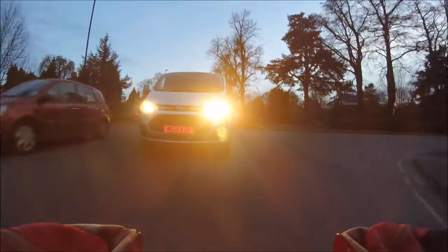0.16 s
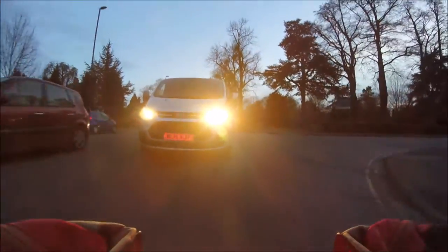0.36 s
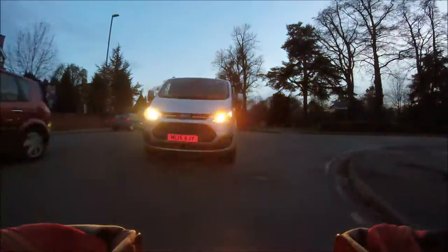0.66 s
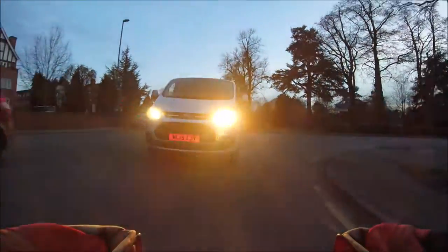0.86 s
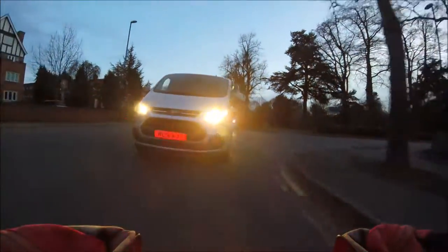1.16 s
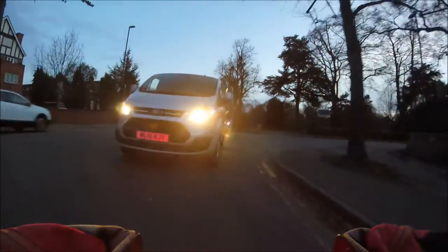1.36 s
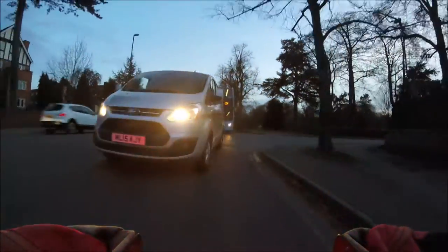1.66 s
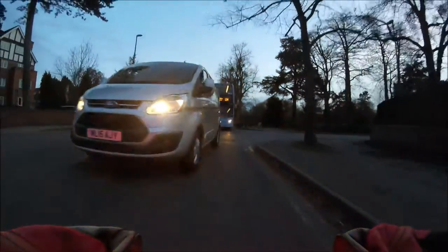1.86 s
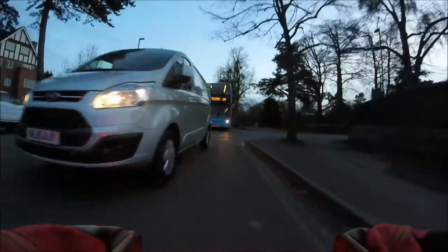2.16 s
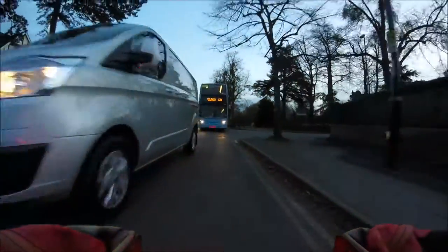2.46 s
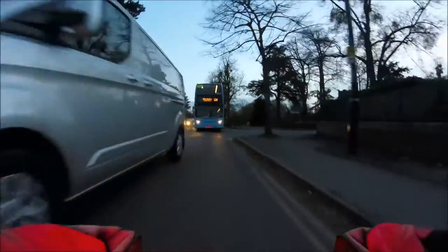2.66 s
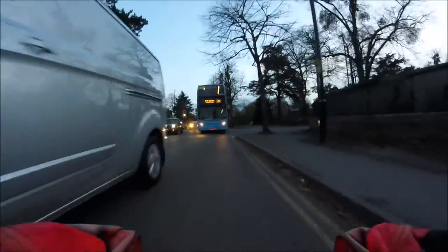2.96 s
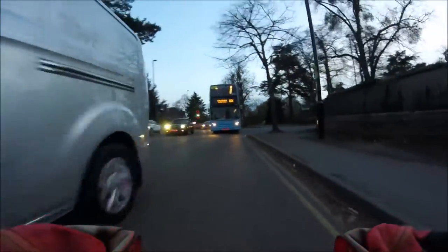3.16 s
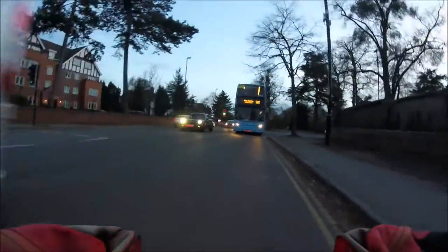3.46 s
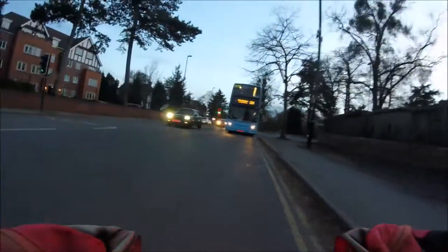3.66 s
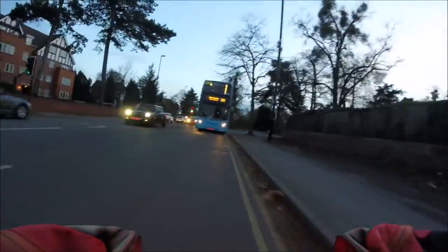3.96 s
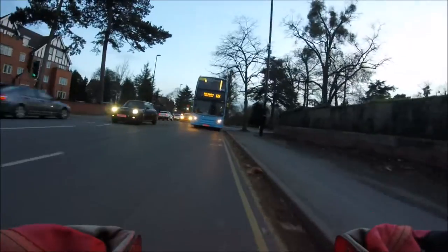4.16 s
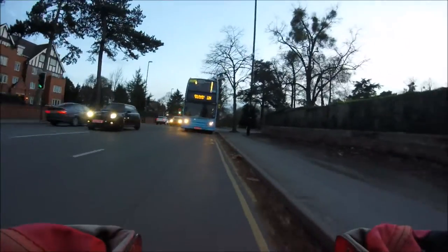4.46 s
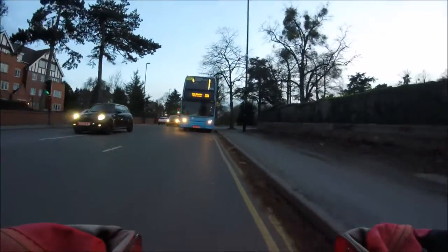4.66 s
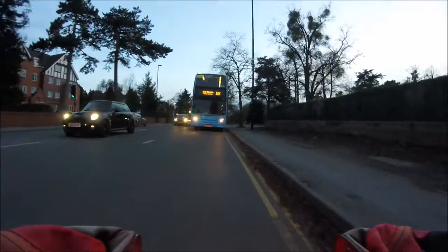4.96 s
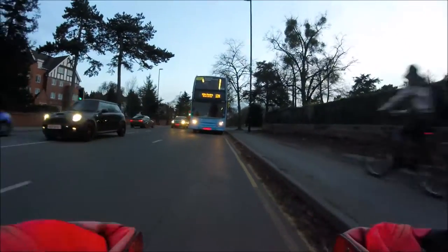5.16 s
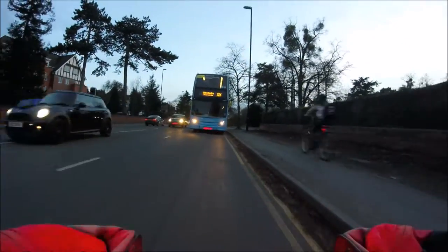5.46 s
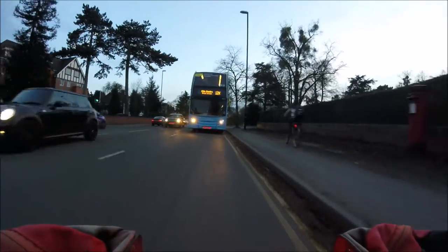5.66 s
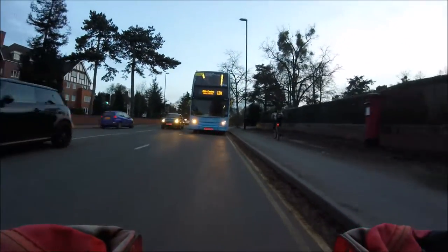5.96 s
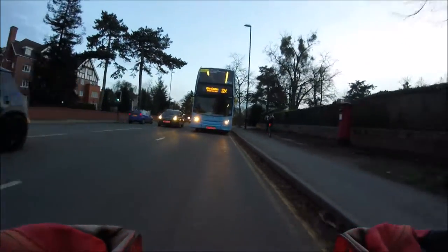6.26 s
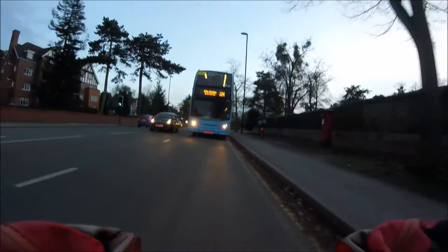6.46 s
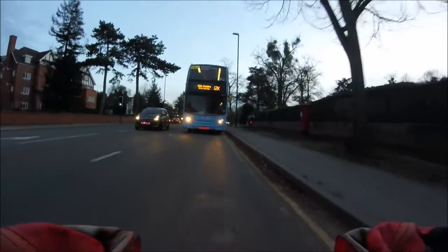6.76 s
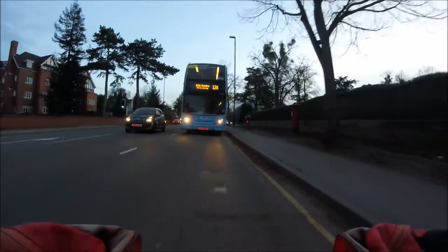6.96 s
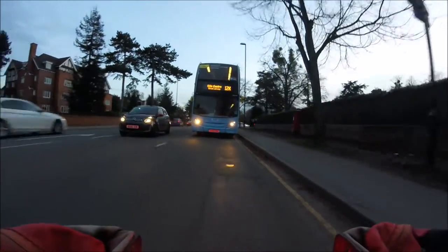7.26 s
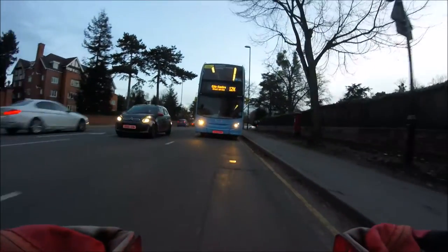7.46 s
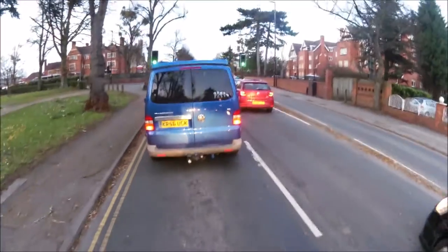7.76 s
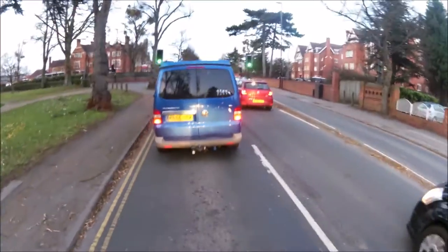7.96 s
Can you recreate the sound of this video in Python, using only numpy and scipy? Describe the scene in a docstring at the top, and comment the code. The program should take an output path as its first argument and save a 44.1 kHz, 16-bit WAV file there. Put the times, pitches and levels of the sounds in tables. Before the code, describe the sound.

From a closed case fixed to a moving bicycle, a loud low hum throbs several times a second over muffled road rattle, wind buffeting and dry plastic knocks. Passing vehicles add only faint hiss. Late on, a dense burst of knocks, heavy thumps and crackling overload, then thinning hum. A hard cut to short silence, then a second, open microphone hears broad tyre roar, a rising engine tone and tiny thin whistles.

```python
"""A small camera in a closed case rides a bicycle in traffic: from the start its mount hums at one low mode, the
case rattles and knocks in its resonances over bumps, wind buffets the port and vehicles hiss past. Late in the
ride the overloaded sound crackles, made of bright ticks. After a short silence a second, open camera hears a
street: roar of tyres in noise bands, an engine in two gliding sines and a thin whistle that comes and goes."""
import sys
import numpy as np
from scipy import signal
from scipy.io import wavfile

SR = 44100
rng = np.random.default_rng(int(sys.argv[2]) if len(sys.argv) > 2 else 0)


def dump_mix(stems):
    """Bounce the given channels to the path in sys.argv[1] as a 16-bit WAV at rate SR."""
    frames = np.atleast_2d(stems).T  # one column per channel
    limited = np.clip(frames, -1, 1)  # hard clip at full scale
    pcm = np.round(limited * 32767).astype(np.int16)
    wavfile.write(sys.argv[1], SR, pcm)


def field_ratio(decibels):
    """Amplitude ratio for a level in dB (20 dB per decade); scalars and array-likes work."""
    return 10 ** (np.asarray(decibels, dtype=float) / 20)


N = 357210
CUT_S, RESUME_S = 7.348, 7.586  # the silence lies between


def rms_one(x):
    """Scales to unit rms."""
    return x / np.sqrt(np.mean(x ** 2) + 1e-20)


def in_time(rows):
    """Columns of a curve table, interpolated at every sample."""
    s, *columns = np.transpose(rows)
    return [np.interp(np.arange(N) / SR, s, c) for c in columns]


def drift(rate_hz):
    """Slow chance of spread 1: noise at every 20th sample through a double one-pole."""
    r = np.exp(-2 * np.pi * rate_hz * 20 / SR)
    noise = rng.standard_normal(N // 20 + 2002)
    slow = signal.lfilter([1], [1, -2 * r, r * r], noise)[2000:]  # leaves out the settling
    return np.interp(np.arange(N) / 20, np.arange(len(slow)), rms_one(slow))


def band(x, low_hz, high_hz, order=2):
    """Butterworth band-pass."""
    return signal.sosfilt(signal.butter(order, [low_hz, high_hz], "band", fs=SR, output="sos"), x)


def filtered(x, order, hz, kind="low"):
    """Butterworth low-pass or high-pass."""
    return signal.sosfilt(signal.butter(order, hz, kind, fs=SR, output="sos"), x)


def resonance(x, hz, width_hz):
    """Two-pole resonance with gain 1 on top."""
    r = np.exp(-np.pi * width_hz / SR)
    zeros = np.array([1, 0, -1]) * (1 - r * r) / 2
    return signal.lfilter(zeros, [1, -2 * r * np.cos(2 * np.pi * hz / SR), r * r], x)


def plateaus(rows, up_db_per_s, down_db_per_s):
    """Gain from rows of (t/s, level/dB, hold/s): each rises, holds and dies away; their powers add."""
    t, power = np.arange(0, N + 32, 32) / SR, 0
    for s, level_db, held in rows:
        early, late = np.maximum(s - t, 0), np.maximum(t - s - held, 0)
        power = power + field_ratio(level_db - up_db_per_s * early - down_db_per_s * late) ** 2
    return np.interp(np.arange(N) / SR, t, np.sqrt(power))


# the road sets the mount swinging on its spring: [t/s at full swing, rms level/dB, hold/s]
SWINGS = [(0.0, -13, 0.1), (0.31, -11, 0.11), (0.46, -12, .11), (0.79, -17, 0.0077), (0.9, -18.5, 0.18),
          (1.13, -13.5, 0.068), (1.34, -20, 0.081), (1.54, -7, 0.02), (1.76, -11, 0.063),
          (1.92, -18.5, 0.096), (2.11, -15.5, 0.0077), (2.24, -12.5, 0.024), (2.36, -12, 0.045),
          (2.53, -15, 0.0045), (2.65, -9.5, 0.1), (2.91, -10, 0.084), (3.15, -13, 0.061),
          (3.28, -11.5, 0.058), (3.47, -18.5, 0.094), (3.68, -15, .005), (3.77, -14.5, 0.17),
          (4.09, -7.5, 0.047), (4.28, -14, 0.015), (4.45, -10, 0.018), (4.6, -9.5, 0.071), (4.82, -14, .1),
          (5.05, -17.5, .005), (5.15, -11, .07), (5.39, -14, .01), (5.49, -15.5, 0.027),
          (5.64, -9.5, 0.036), (5.83, -11, 0.14), (6.03, -12, 0.056), (6.19, -11, 0.051),
          (6.34, -9.5, 0.089), (6.64, -13, 0.014), (6.86, -18.5, 0.0041), (6.96, -26.5, .1),
          (7.17, -21.5, 0.022), (7.24, -35, .01), (7.31, -14, 0.037)]


def mount():
    """The mount's mode is a near sine whose pitch wavers, with a weak overtone."""
    mode_hz = 69.56 * (1 + 0.02215 * drift(9.9))
    phase = 2 * np.pi * np.cumsum(mode_hz) / SR
    swing = np.sin(phase) + field_ratio(-30.0) * np.sin(2 * phase)
    gain = plateaus(SWINGS, up_db_per_s=224, down_db_per_s=145.5)
    return np.sqrt(2) * gain * swing


# slow jolts of the whole frame: [t/s, peak level/dB, length/s, direction (1 up, -1 down)]
JOLTS = [(0.292, -7, 0.058, -1), (0.72, -15, 0.04, -1), (0.996, -5.5, 0.014, -1), (1.622, -10, 0.017, -1),
         (2.616, -16, 0.023, -1), (3.686, -8, 0.011, -1), (5.396, -5.5, 0.0065, -1),
         (6.49, -2.5, 0.014, -1), (6.648, -9, 0.02, -1), (6.6847, -1, 0.0035, 1)]


def jolts():
    """Each jolt is one push of the frame, with weaker swings the other way on both sides of it."""
    t, out = np.arange(N) / SR, np.zeros(N)
    for s, peak_db, length, direction in JOLTS:
        near = slice(max(round((s - .15) * SR), 0), round((s + .15) * SR))
        x = (t[near] - s) / (length / 4)
        out[near] += np.sign(direction) * field_ratio(peak_db) * (1 - 0.36 * x ** 2) * np.exp(-x ** 2 / 2)
    return out


def road_grit(per_s, size_db, t60):
    """Road texture: small uneven jolts ride on a steady shake, and the whole flickers."""
    struck = rng.random(N) < per_s / SR
    small_jolts = struck * field_ratio(size_db + 6 * np.minimum(rng.exponential(1, N), 3))
    r = field_ratio(-60 / (t60 * SR))
    return rms_one(field_ratio(1.6 * drift(76)) * (1 + signal.lfilter([1], [1, -r], small_jolts)))


# knocks of the case: [t/s, relative strength/dB, hardness/dB, favoured f/Hz, extra low weight/dB]
KNOCKS = [(0.0869, -19, 15, 2190, -5), (0.2961, -12, -11, 2190, -3), (0.542, -7.5, -9.5, 2670, 7),
          (0.5437, -17.5, -18, 595, 4), (0.552, -22, -17, 2190, 3), (0.608, -16.5, -7, 2190, -2),
          (0.661, -18, -14, 1600, -7), (1.0983, -23.5, -14, 2140, -6), (1.144, -24, 10, 1600, 3),
          (1.15, -17, 1, 2220, -6), (1.153, -24, 13, 6360, -2), (1.1712, -12, 1, 2670, 0),
          (1.1825, -10.5, 4, 2190, 2.5), (1.184, -11.5, 2, 3300, 0), (1.1965, -20, 3, 1550, -1),
          (1.202, -22, 5, 3970, 2), (1.3504, -34, 8, 3340, 2.5), (1.6606, -21.5, 3, 2320, -2),
          (1.8085, -13, 0, 2100, -6), (1.8097, -10.5, 0, 2760, 5), (1.8715, -24, -3, 1520, 4.5),
          (1.9166, -31, -7, 1600, -5), (2.0665, -25, -10, 2100, 7), (2.0749, -18.5, 5, 1450, 1.5),
          (2.5356, -22, 1.5, 2190, 3), (2.8096, -19.5, -1, 1150, 6.5), (2.8184, -17, -4, 2190, -1),
          (2.824, -14, 10, 1600, -3), (2.871, -16, -3, 1600, 0.5), (2.9864, -18, 1, 1600, -2),
          (2.9936, -22, -2, 3320, 0), (3.0171, -11, 11, 2190, 2), (3.018, -14.5, 2.5, 1600, 2),
          (3.0325, -26, -9, 1600, 3), (3.29, -22.5, 7, 2190, -1), (3.508, -22, -1, 1330, -12),
          (4.0524, -15, 5.5, 1620, 4.5), (4.7632, -14, -12, 1150, 3), (4.7858, -32.5, 7, 2800, -2),
          (4.7922, -8, -1, 3930, -3), (4.7926, -10, 2, 2665, 0.5), (4.807, -37, -4, 4000, 0),
          (5.65, -31, 17, 2190, -3), (6.359, -19, 1.5, 1680, 2), (6.479, -28, 7, 2190, 2),
          (6.5177, -20.5, -7, 1150, -3), (6.533, -28, 2, 3990, 1), (6.5419, -8, 3, 3230, -3),
          (6.6, -22.5, 11, 1600, -13), (6.647, -21, 3, 2010, -1.5), (6.658, -27, 2, 3920, 6),
          (6.6822, -6, 2, 2190, 6), (6.692, -7, 3.5, 1494, -4), (6.6978, -12, -4, 3910, -3.5),
          (6.7018, -16, 8, 1600, 3.5), (6.717, -16.5, 5.5, 2190, 2), (6.7297, -24, 1, 2670, -4),
          (6.7563, -25, -4, 2600, -1), (6.7926, -34, 0, 1600, 0), (6.8285, -12.5, 0, 1600, -5),
          (6.8374, -11, -9, 1150, -5.5), (6.8405, -9.5, -2, 2700, -2), (6.8475, -16, 0, 2190, -4),
          (6.8523, -14, 4, 2190, -6), (6.857, -23, -3, 1600, -7), (6.8662, -11, 5.5, 1560, -0.5),
          (6.8845, -21, 4, 2670, 1), (6.893, -32, 4, 3900, 0), (7.2072, -17.5, 5.5, 2100, -2.5)]


def knock_drive(strength_db, hz, spread_db, favour_db, blow_db):
    """How the knocks drive one mode: a short rattling burst with a faint tail, and the blow that opens it."""
    s, _, _, own_hz, _ = np.transpose(KNOCKS)
    # modes nearest a knock's own pitch gain most
    favoured_db = favour_db * np.exp(-(np.log2(hz / own_hz) / 0.21) ** 2)
    uneven_db = spread_db * rng.standard_normal(len(s))
    gains = field_ratio(strength_db + favoured_db + uneven_db)
    t = np.arange(SR // 10) / SR
    decay = field_ratio(-60 * (t / 0.013) ** 1.7)
    tail = field_ratio(-20.0 - 60 * t / 0.06)
    burst = np.minimum(t / 0.0007, 1) * (decay + tail)
    rattle, blows = np.zeros((2, N))
    for i, gain in zip(np.round(s * SR).astype(int), gains):
        rattle[i:i + len(t)] += gain * burst
        blows[i] = gain * field_ratio(blow_db)
    return rattle, blows


def case(modes, shake_db, knock_db, grit, even, narrow, patchy_db, favour_db, blow_db, tilt_db=0):
    """Road noise and knocks drive the same resonances, set in parallel with alternating sign."""
    noise, out, power = rng.standard_normal(N), 0, 0
    for k, (hz, width_hz, mode_db) in enumerate(modes):
        evened_db = knock_db - even * mode_db  # a knock reaches the weak modes better than the road does
        rattle, blows = knock_drive(evened_db, hz, 2.5, favour_db, blow_db)
        shake = field_ratio(shake_db + tilt_db * np.log2(hz / 350) + patchy_db * drift(11.6)) * grit
        drive = noise * (shake + rattle)
        drive = drive + blows * (150 / width_hz) ** narrow  # how far a blow prefers the long-ringing modes
        twice = resonance(resonance(drive, hz, 1.384 * width_hz), hz, 2.36 * width_hz)
        out = out + (-1) ** k * field_ratio(mode_db) * twice
        power += field_ratio(mode_db) ** 2 * 1.75 * width_hz * np.pi / SR
    return out / np.sqrt(power)


def loose_parts():
    """At each knock a loose part chatters for a moment at the knock's own pitch, then is damped."""
    rise_s, held_s, t60_s = 0.0012, 0.003, 0.018
    t, out = np.arange(SR // 20) / SR, np.zeros(N)
    shape = np.minimum(t / rise_s, 1) * field_ratio(-60 * np.maximum(t - held_s, 0) / t60_s)
    chance = rng.random((len(KNOCKS), 2))
    for (s, strength_db, _, hz, _), (start, bend) in zip(KNOCKS, chance):
        i = round(s * SR)
        phase = 2 * np.pi * (start + hz * t * (1 + 2.1 * (bend - .5) * t))  # the pitch bends up or down
        level_db = strength_db - 11.5 - 11.0 * max(np.log2(hz / 4000), 0)  # weaker above 4 kHz
        out[i:i + len(t)] += field_ratio(level_db) * shape * np.sin(phase)
    return out


# vehicles passing: [t/s when nearest, level/dB, approach/s, departure/s]
PASSES = [(0.0, -62, .1, 0.044), (2.599, -69.5, 0.94, 1), (3.7, -65, 0.32, 0.2)]


def passing():
    """Gain of the tyre noise, falling off with distance around each pass, over a faint constant floor."""
    t, power = np.arange(N) / SR, field_ratio(-82) ** 2
    for s, level_db, coming, going in PASSES:
        distance = (t - s) / np.where(t < s, coming, going)
        power = power + field_ratio(level_db) ** 2 / (1 + distance ** 2) ** 2
    return np.sqrt(power)


# the road as it shakes the case: [t/s, roughness level/dB, fineness of its grain/dB]
ROAD = [(0.0, -31, 0), (0.25, -26.5, -1.5), (0.37, -34.5, 3), (0.7, -33, -2), (0.86, -35, 3),
        (1.05, -32, -4), (1.18, -32.5, 9.5), (1.23, -41, 1), (1.72, -41, -2.5), (2.68, -37.5, -1),
        (3.16, -39.5, -1.5), (3.77, -35, -1.5), (4.2, -37.5, -1.5), (4.75, -35.5, -2), (5.09, -36.5, -3),
        (5.41, -33.5, 1), (5.83, -34, -3), (5.99, -38.5, -3), (6.27, -34, -1.5), (6.44, -40.5, 0),
        (6.55, -42.5, -1.5), (6.66, -42, -2), (6.71, -36.5, 5), (6.79, -49, -8.5), (6.86, -40.5, -3),
        (6.92, -46, 0), (6.98, -45, -1), (7.2, -40, -1)]
# resonances of the case in four groups: [f/Hz, nominal width/Hz, level/dB relative within the group]
CASE_LOW = [(194.4, 32, -8.5), (281.6, 75.6, -6), (320.7, 36.5, 0.5), (352, 20.8, 2.5), (419, 13, -7),
            (454.3, 36, -17), (479.7, 53, -9), (590, 146, -20.5), (679.4, 76, -16.5), (790, 107, -26.5)]
CASE_MID = [(1150, 330, -6), (1330, 228, -3), (1600, 79.4, 1), (1949, 96, -7), (2190, 120, -1.5),
            (2398, 110, -7.5)]
CASE_UPPER = [(2640, 187, -2), (3133, 290, -9.5), (3291, 92, 4), (3868, 220, -6.5), (4050, 270, -12.5),
              (4260, 130, -6), (4606, 260, -19.5)]
CASE_HIGH = [(5440, 260, -2), (5860, 140, -0.5), (6420, 250, 5), (7190, 410, -2), (7860, 580, -20.5),
             (9400, 860, -17.5)]


def ringing_case(hum):
    """Four groups of resonances and the loose parts ring together; the case dulls the top."""
    road_db, fine_db = in_time(ROAD)
    _, strength_db, hard_db, _, weight_db = np.transpose(KNOCKS)
    # how a knock reaches the low, upper and treble groups, by its strength and its hardness
    thud_db = -13 + 0.58 * strength_db - 0.22 * hard_db
    snap_db = -20.5 + strength_db + 0.75 * hard_db
    tick_db = -41 + 0.91 * strength_db + hard_db
    # finer grain takes from the low group and adds to the treble; passing tyres enter the treble too
    low_db = road_db + 13.5 - 0.78 * fine_db
    road_treble = field_ratio(road_db - 24 + 0.31 * fine_db)
    treble_db = 10 * np.log10(road_treble ** 2 + (field_ratio(7.5) * passing()) ** 2)
    tilt_db = 0.3 * (road_db - road_db.mean())  # dB per octave: brighter when rough
    grit = road_grit(per_s=51.0, size_db=-11.0, t60=0.005)
    treble_grit = grit ** 1.1 * field_ratio(8 * hum)  # the hum sways the treble rattle
    low = case(CASE_LOW, low_db, thud_db - 8 + weight_db, grit ** 0.27, even=0.59, narrow=0.12,
               patchy_db=1.5, favour_db=1.8, blow_db=27.0, tilt_db=tilt_db)
    body = case(CASE_MID, road_db - 0.08, strength_db - 13.5, grit, even=0.086, narrow=0.5,
                patchy_db=2.0, favour_db=6.5, blow_db=21.5)
    snap = case(CASE_UPPER, road_db - 6.5, snap_db, grit, even=0.19, narrow=0.18,
                patchy_db=2.5, favour_db=12.5, blow_db=23.0)
    high = case(CASE_HIGH, treble_db, tick_db, treble_grit, even=0.35, narrow=0.3,
                patchy_db=1.5, favour_db=16.0, blow_db=5.5)
    return filtered(low + body + snap + high + loose_parts(), 4, 9800)


# wind at the port, heard below the hum: [t/s, level/dB]
WIND = [(0.0, -31.5), (0.33, -14), (0.43, -30.5), (1.04, -20), (1.39, -43), (1.64, -16), (1.69, -24),
        (2.57, -23.5), (2.62, -14.5), (2.82, -25), (5.99, -25.5), (6.52, -21.5), (6.95, -42.5),
        (7.34, -34.5)]


def buffet():
    """Lumpy noise on either side of the hum, with a weaker resonance of the wind noise above it."""
    (wind_db,), (road_db, _) = in_time(WIND), in_time(ROAD)
    above_db = -27.5 + 0.2 * (wind_db - wind_db.mean()) + 0.88 * (road_db - road_db.mean())
    # it starts weaker while the bicycle gathers speed
    above_db = above_db - 9 * np.exp(-np.arange(N) / SR / 0.98)
    lumps = field_ratio(3 * np.clip(drift(6), -2, 1.5))
    below = rms_one(band(rng.standard_normal(N), 36, 66, order=3) * lumps)
    noise = rng.standard_normal(N)
    wind_mode = resonance(resonance(noise, 132, 14.0), 160, 60.0)
    above = band(noise, 75, 142.0, order=3) + field_ratio(-5.5) * wind_mode
    return field_ratio(wind_db) * below + field_ratio(above_db) * rms_one(above * field_ratio(2.0 * drift(34)))


# moments when the overloaded sound clips and crackles: [start t/s, length/s, level/dB]
OVERLOADS = [(6.49, 0.24, -57), (6.772, .008, -62.5), (6.843, 0.056, -58.5)]


def crackle():
    """Crackle of overload, drawn as sharp ticks of uneven size, each a puff of bright noise."""
    ticks = (rng.random(N) < 300.0 / SR) * field_ratio(4.0 * np.minimum(rng.exponential(1, N), 3))
    r = field_ratio(-60 / (0.0081 * SR))  # t60 8.1 ms
    puffs = rms_one(signal.lfilter([1], [1, -r], ticks + 1e-18) * rng.standard_normal(N))
    rows = [(s, db, length) for s, length, db in OVERLOADS]
    gain = plateaus(rows, up_db_per_s=698, down_db_per_s=698)
    return gain * rms_one(band(puffs, 5000, 9500) + field_ratio(-20.0) * band(puffs, 9000, 13000))


def tyres():
    """Smooth bright hiss that falls towards the top, lifted by one resonance of the port."""
    noise = rng.standard_normal(N)
    smooth = band(band(noise, 8200, 9000, order=1), 7300, 13000)
    hiss = smooth + field_ratio(7.0) * resonance(noise, 8000, 350.0)
    return passing() * rms_one(band(hiss, 5000, 15500))


def shaken_camera():
    """All that the closed camera hears, without the deepest bass."""
    hum = mount()
    whole = hum + buffet() + jolts() + ringing_case(hum) + crackle() + tyres()
    return filtered(whole, 2, 14, "high")


# colour of the street heard by the open camera: [f/Hz, relative level/dB per Hz band]
STREET = [(190, -1.5), (690, 4), (1200, 2.5), (2240, -4), (3270, -9.5), (3800, -14.5), (5340, -20.5),
          (5860, -19), (6600, -40), (7400, -24), (8440, -32), (8960, -52), (11000, -56)]


def street_roar():
    """Tyre roar in sixth-octave noise bands that swell and sink independently."""
    edges, out = 190 * 2 ** np.arange(0, 5.9, 1 / 6), 0
    hz, colour_db = np.transpose(STREET)
    white = rng.standard_normal((2, N))  # neighbouring bands take turns
    for k, (low, high) in enumerate(zip(edges, edges[1:])):
        gain_db = np.interp(np.log(low * high) / 2, np.log(hz), colour_db)
        out = out + field_ratio(gain_db + 1.3 * drift(12.7)) * band(white[k % 2], low, high)
    return field_ratio(-32.5) * rms_one(filtered(out, 8, 12400))


def engine():
    """The firing tone of an engine ahead revs up and levels off; a lower tone keeps climbing and fades."""
    since = np.maximum(np.arange(N) / SR - RESUME_S, 0)
    start_hz, top_hz, rev_s = 142.3, 170, 0.17
    firing_hz = top_hz - (top_hz - start_hz) * np.exp(-since / rev_s)
    firing = field_ratio(-44 + 2.7 * drift(7.5)) * np.sin(2 * np.pi * np.cumsum(firing_hz) / SR)
    lower_phase = 2 * np.pi * since * (85 + 48 * since / 2)  # from 85 Hz, rising 48 Hz per s
    lower = field_ratio(-40.5 - 14 * since + 1.9 * drift(9.2)) * np.sin(lower_phase)  # fades 14 dB per s
    return firing + lower


# a thin whistle in the street comes and goes: [t/s, peak level/dB, hold/s]
WHISTLES = [(7.82, -63, 0.12), (8.05, -60, 0.055)]
# its central pitch: [t/s, f/Hz]
WHISTLE_PITCH = [(7.81, 7340), (7.96, 7600), (8.04, 7330)]


def whistle():
    """A thin sine that glides and trembles in pitch."""
    pitch_hz, = in_time(WHISTLE_PITCH)
    phase = 2 * np.pi * np.cumsum(pitch_hz + 40.0 * drift(60)) / SR
    return plateaus(WHISTLES, up_db_per_s=900, down_db_per_s=900) * np.sin(phase)


def rumble():
    """A little steady low noise under the street."""
    return field_ratio(-48.5) * rms_one(band(rng.standard_normal(N), 30, 210))


def street():
    """All that the open camera hears."""
    return street_roar() + engine() + whistle() + rumble()


def scene():
    """First camera, a hard cut to silence, then the second camera."""
    t = np.arange(N) / SR
    fade_in = np.clip((t - RESUME_S) / 0.009, 0, 1)
    return (shaken_camera() * (t < CUT_S) + street() * fade_in)[None]


def band_limit(x):
    """A steep low-pass at the top of the band."""
    return signal.sosfilt(signal.butter(12, 15760, fs=SR, output="sos"), x)


def record(dry):
    """Lifts the level a little and rounds the peaks."""
    rounded = 1.528 * np.tanh(dry / 1.22)
    return band_limit(rounded)


dry = scene()
out = record(dry)
dump_mix(out)
```